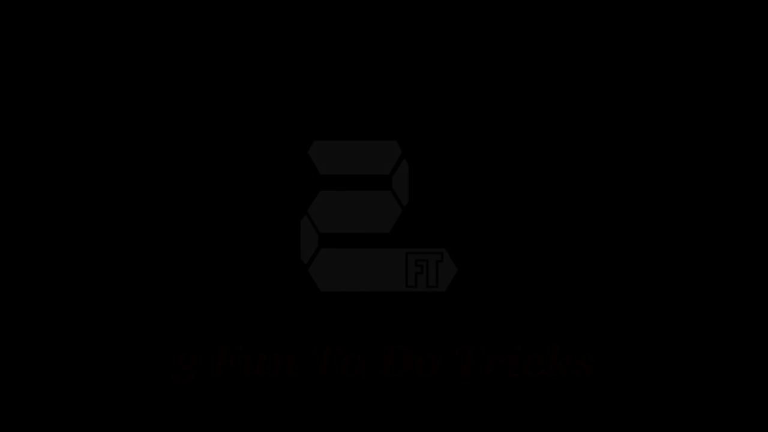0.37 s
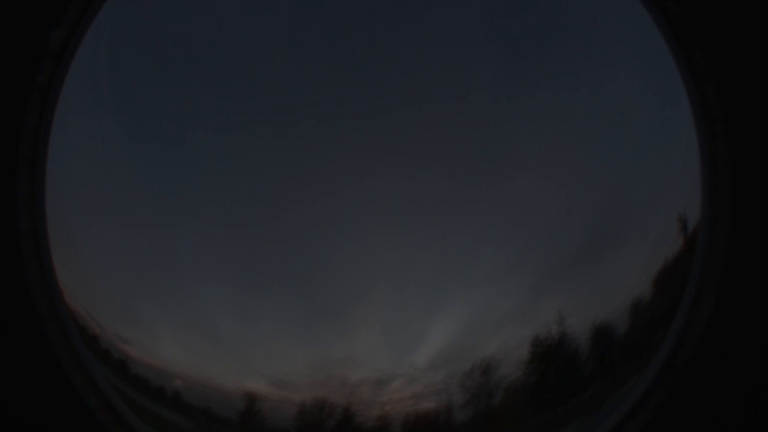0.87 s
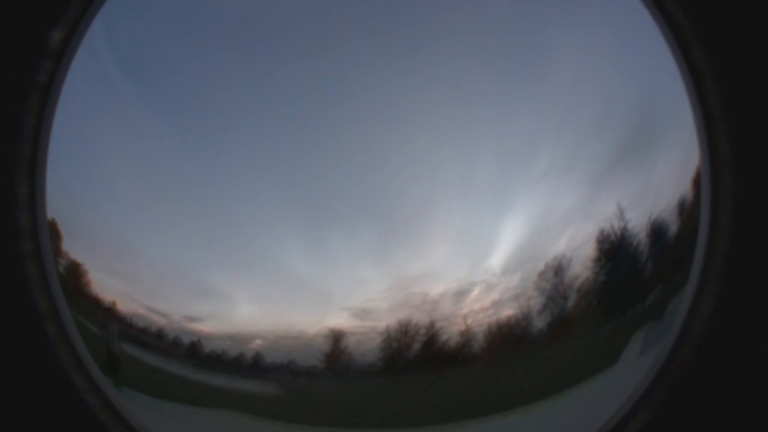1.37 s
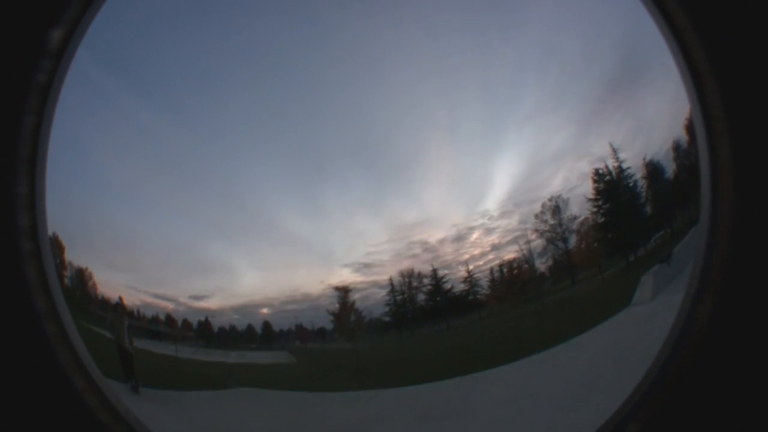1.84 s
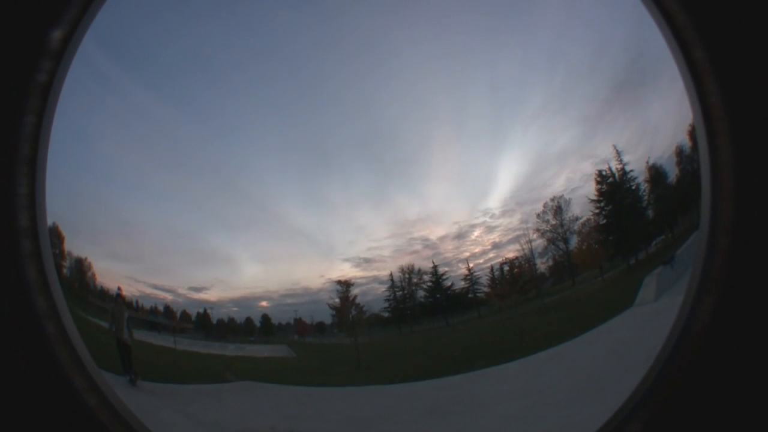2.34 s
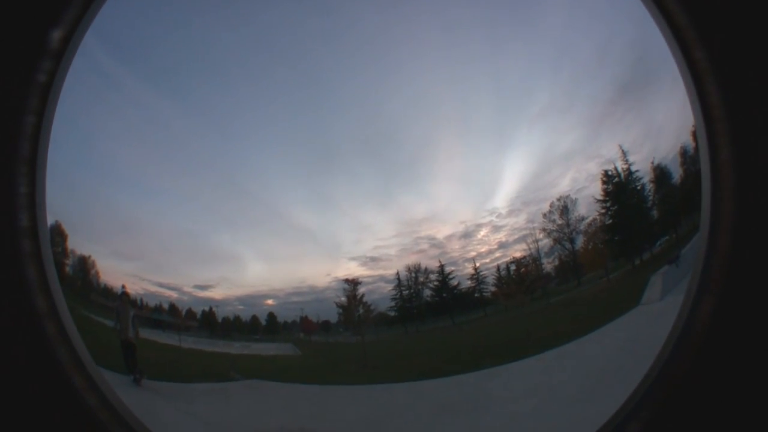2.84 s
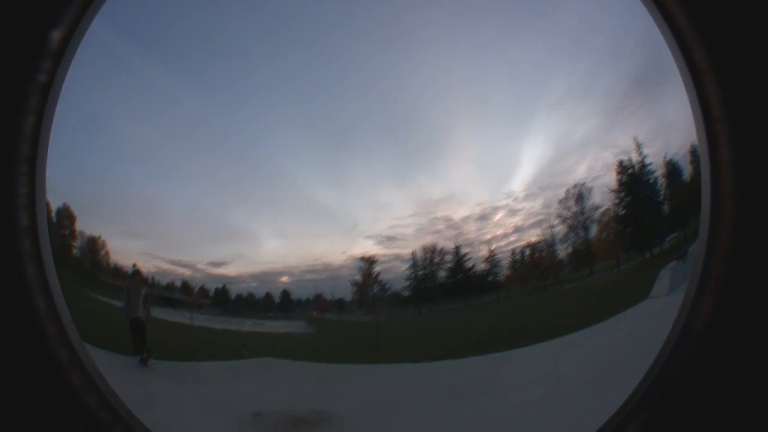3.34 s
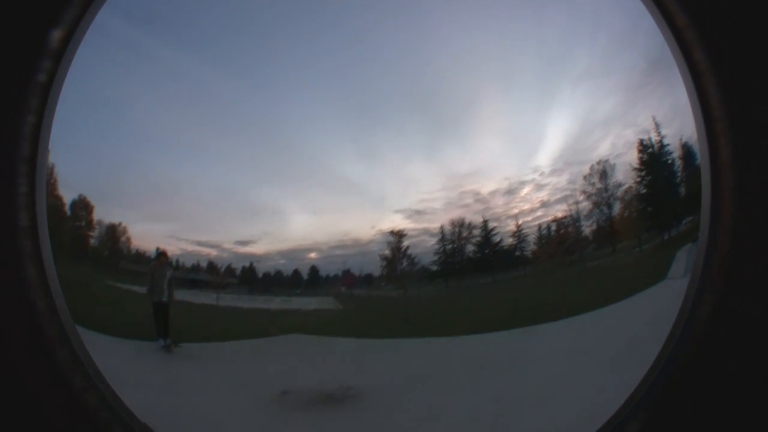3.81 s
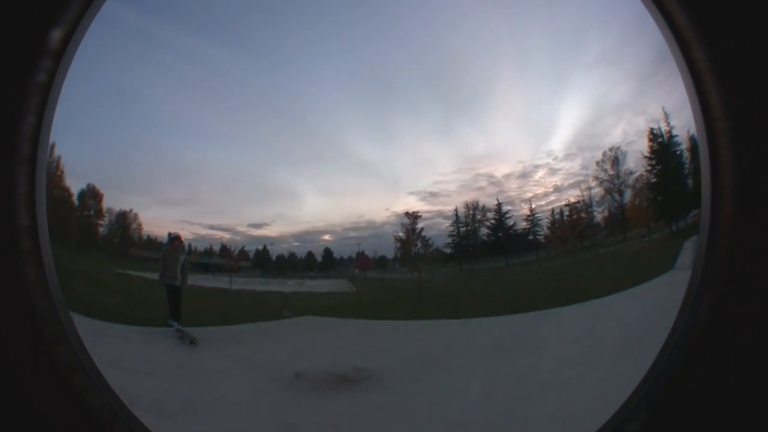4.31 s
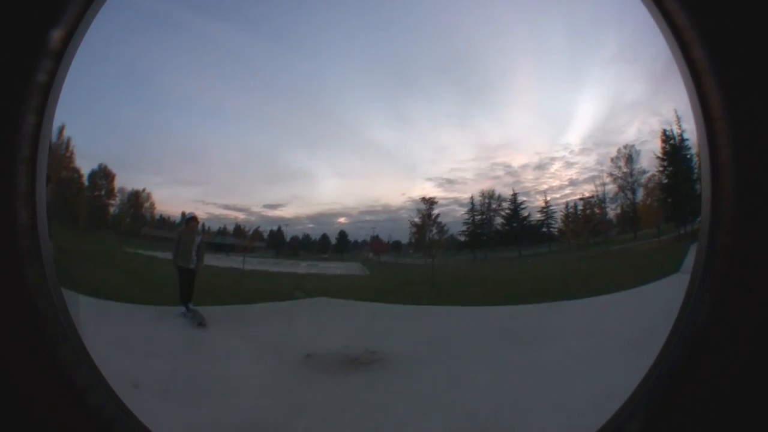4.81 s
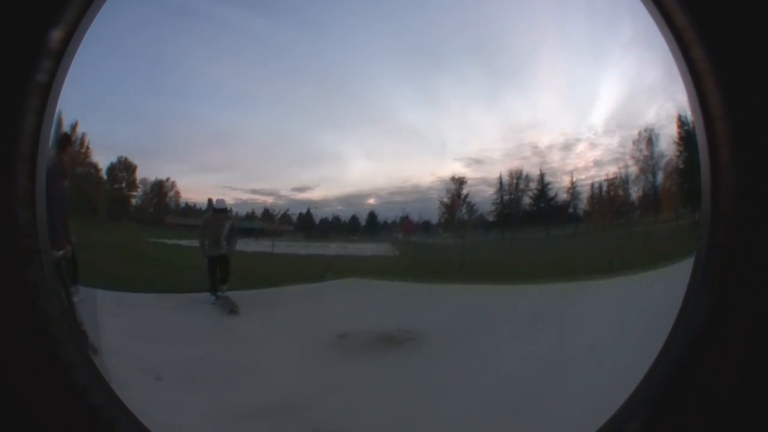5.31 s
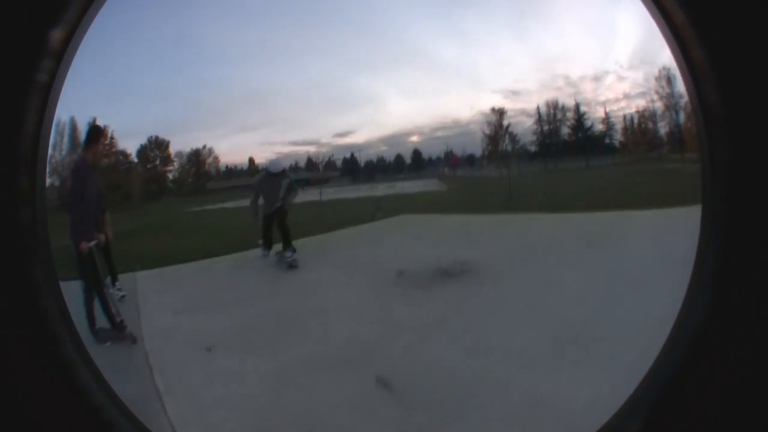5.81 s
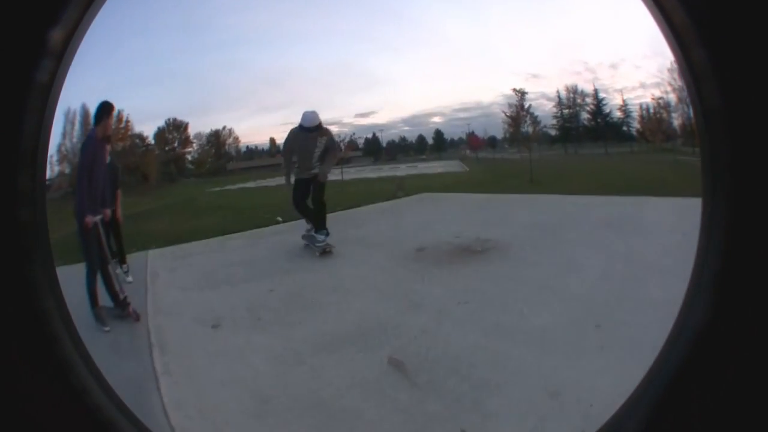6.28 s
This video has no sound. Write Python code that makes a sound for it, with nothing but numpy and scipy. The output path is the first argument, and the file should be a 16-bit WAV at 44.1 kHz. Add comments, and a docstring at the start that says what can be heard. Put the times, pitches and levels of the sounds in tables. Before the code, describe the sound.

After a brief silence, skateboard wheels rumble and rattle over outdoor concrete, with hard wooden pops, clattering landings and gritty scuffs close by.

```python
"""Concrete pad in an open park: skateboards close to a small camera with two microphone ports.
Noise bands give the slab rumble, tyre noise, scuffing soles and tails, and air at the ports.
Grit under the wheels rattles modes of the wooden deck; some modes drone, and metal trucks jingle.
Pops, landings and bumps strike the deck modes with chattering contacts; the highest peaks clip flat."""
import sys
import numpy as np
from scipy import signal
from scipy.fft import rfft, irfft
from scipy.io import wavfile
from scipy.ndimage import uniform_filter1d

SR = 44100
rng = np.random.default_rng(int(sys.argv[2]) if len(sys.argv) > 2 else 0)


def voltage_ratio(decibels):
    """Convert decibels (scalar or array-like) to amplitude ratios, 20 dB per decade."""
    exponent = np.asarray(decibels, float) / 20
    return 10 ** exponent


def materialize(psi):
    """Save the field psi as 16-bit PCM at rate SR to the path in sys.argv[1].

    A 1-D psi becomes a single channel; in a 2-D psi each row is a channel.
    """
    bounded = np.clip(np.atleast_2d(psi).T, -1, 1)
    quanta = np.round(bounded * 32767).astype(np.int16)
    wavfile.write(sys.argv[1], SR, quanta)


N = 282681

# Wheels on concrete. Each row: time in s, rattle level in dB, centre in Hz of the deck modes that the grit shakes.
ROLLING = [(0.7, -36, 726), (1.0, -27, 745), (1.2, -27, 500), (1.32, -44, 508), (1.41, -20, 584),
           (1.46, -23.5, 496), (1.56, -38, 530), (1.8, -30, 449), (2.02, -36.5, 524), (2.35, -28.5, 452),
           (2.62, -36.5, 468), (2.85, -23, 740), (3.2, -32, 545), (3.75, -21.5, 714), (4.0, -23.5, 640),
           (4.2, -16.5, 546), (4.5, -22, 512), (4.68, -16.5, 529), (4.86, -21.5, 478), (5.1, -16.5, 467),
           (5.3, -18.5, 494), (5.45, -20.5, 476), (5.65, -21, 390), (5.8, -23, 390), (5.92, -30, 738),
           (6.1, -35.5, 716), (6.35, -24, 402)]
# Modes of deck and trucks. Each row: frequency in Hz, level in dB, free ring time t60 in s ahead of damping.
DECK_MODES = [(210.3, 4, 0.15), (255.5, 2.5, 0.15), (310, 10, 0.041), (369, 4, 0.1), (457, 3, 0.03),
              (531.8, 3, 0.041), (622, 3, 0.046), (745, -11.5, 0.22), (810.6, 1, 0.049), (1001, 13, 0.017),
              (1063, 6.5, 0.051), (1150, -1, 0.0057), (1300, -7, 0.09), (1352, -8.5, 0.16),
              (1490, -5.5, 0.023), (1720, 5, 0.0065), (2200, 4.5, 0.0084), (2670, 1.5, 0.032)]


def evened(x):
    """Scales to an rms of 1."""
    return x / np.sqrt(np.mean(x ** 2) + 1e-20)


def crest(x):
    """Scales the loudest few milliseconds to an rms of 1."""
    return x / np.sqrt(uniform_filter1d(x ** 2, SR // 150).max())


def read(points, hz):
    """Reads a table on a log-frequency axis."""
    f, value = np.transpose(points)
    return np.interp(np.log(hz + 1), np.log(f + 1), value)


def columns(rows):
    """Turns curve rows into one value a sample, one array a column after the time."""
    s, *cols = np.transpose(rows)
    return [np.interp(np.arange(N) / SR, s, c) for c in cols]


def colour(x, points):
    """Filters by a spectrum in dB."""
    gain = voltage_ratio(read(points, np.fft.rfftfreq(len(x), 1 / SR)))
    return irfft(rfft(x) * gain, len(x))


def soften(x, edge_hz):
    """A soft contact passes little above its edge."""
    return signal.sosfilt(signal.butter(3, edge_hz, fs=SR, output="sos"), x)


def ring(x, hz, t60_s):
    """One damped mode: a unit click rings at height 1."""
    radius = np.exp(-np.log(1000) / (t60_s * SR))
    angle = 2 * np.pi * hz / SR
    return signal.lfilter([.5, 0, -.5], [1, -2 * radius * np.cos(angle), radius * radius], x)


def near(hz, centre_hz, db_per_octave):
    """Modes far from the centre of the excitation are driven less."""
    return voltage_ratio(-db_per_octave * abs(np.log2(hz / centre_hz)))


def lumps(seconds, rms_db):
    """A gain that wanders at random on the given time scale."""
    size = max(round(seconds * SR), 2)
    smooth = uniform_filter1d(uniform_filter1d(rng.standard_normal(N), size), size)
    return voltage_ratio(rms_db * evened(smooth))


def grit(per_s, spread_db):
    """Random grains of sand under the wheels, a few of them large."""
    size = voltage_ratio(spread_db * np.minimum(rng.exponential(1, N), 4))
    return size * rng.standard_normal(N) * (rng.random(N) < per_s / SR)


def scuffed():
    """Grind and hiss gains: the tyres' levels, with a smooth swell for each scuff of sole or tail."""
    # Each row: time in s, grind level in dB, hiss level in dB.
    tyre_db = [(0.66, -28.5, -45), (0.9, -29, -39.5), (1.05, -24.5, -43), (1.2, -26.5, -40),
               (1.54, -35, -46.5), (1.8, -25.5, -40.5), (2.2, -32, -43), (2.5, -24, -40),
               (2.62, -31, -40.5), (3.0, -40.5, -45.5), (3.22, -24.5, -46), (3.5, -35.5, -42.5),
               (3.9, -29.5, -46), (4.5, -39.5, -46.5), (5.1, -42, -48.5), (5.3, -62, -55.5),
               (5.46, -62, -49.5), (5.62, -37, -51), (5.645, -70, -60.5), (5.8, -48, -53.5),
               (5.82, -35, -49), (5.9, -39.5, -47.5), (6.05, -33, -48.5), (6.16, -33, -49),
               (6.26, -29, -51), (6.38, -23, -37.5)]
    # Each row: middle in s, length in s, grind level in dB, hiss level in dB.
    scuffs = [(0.796, 0.085, -20.5, -27.5), (0.97, 0.11, -45, -46.5), (1.699, 0.073, -40, -39),
              (1.858, 0.13, -31, -35), (2.143, 0.19, -30, -37), (1.394, 0.064, -15.5, -26),
              (1.419, 0.017, -31.5, -25.5), (2.336, 0.14, -21.5, -33.5), (2.45, 0.086, -24.5, -38),
              (2.511, 0.052, -22.5, -27.5), (2.7, 0.16, -32, -35.5), (4.28, 0.13, -24, -39),
              (4.561, 0.11, -43, -37.5), (4.723, 0.33, -40.5, -36.5), (5.172, 0.14, -50, -36.5),
              (5.865, 0.2, -25, -45.5), (6.229, 0.055, -26, -62), (6.317, 0.049, -34, -48)]
    t = np.arange(N) / SR
    gains = voltage_ratio(np.array(columns(tyre_db)))
    for middle_s, length_s, *db in scuffs:
        swell = np.cos(np.pi * np.clip((t - middle_s) / length_s, -.5, .5)) ** 2
        gains = np.hypot(gains, voltage_ratio(np.array(db))[:, None] * swell)
    return gains


def bed():
    """Lumpy rumble through the slab, sandy grind and hiss, a swish of urethane, air stirring at the ports."""
    # Each row: time in s, level in dB.
    slab_db = [(0.66, -34), (0.76, -26), (0.87, -28), (1.18, -27.5), (1.31, -20), (1.4, -14), (1.5, -40),
               (1.75, -26.5), (2.4, -27), (2.7, -29.5), (3.26, -25), (3.53, -31.5), (3.94, -33.5),
               (4.7, -26), (5.0, -26.5), (5.2, -23.5), (5.38, -25), (5.57, -30.5), (6.11, -25.5),
               (6.36, -24.5)]
    swish_db = [(0.66, -46), (0.8, -44.5), (1.34, -40), (1.5, -55), (1.71, -41), (1.85, -40.5),
                (2.3, -42.5), (2.52, -39), (2.78, -42), (3.37, -48), (3.81, -52.5), (4.18, -52),
                (4.8, -50.5), (5.42, -66), (5.62, -56), (5.65, -73), (5.8, -76), (5.82, -42), (5.9, -52),
                (6.0, -53), (6.08, -43), (6.16, -50), (6.25, -37.5), (6.38, -36.5)]
    wind_db = [(0.7, -35.5), (1.1, -34), (1.37, -32), (1.56, -37), (1.7, -33.5), (2.6, -35.5),
               (2.87, -30.5), (3.03, -53), (3.4, -37), (3.75, -39), (4.1, -35), (5.3, -34), (5.5, -27),
               (6.35, -29.5)]
    # Each row: frequency in Hz, relative level in dB per Hz.
    rumble_colour = [(47, -11), (80, -11.5), (124, -1), (194, 7), (238, 4), (300, 5.5), (390, -2.5),
                     (660, -120)]
    grind_colour = [(700, 7.5), (1200, 2.5), (1500, -6), (2000, -8.5), (2500, -10.5), (2800, -12.5),
                    (3200, -21), (4000, -36.5), (5500, -29), (22000, -83)]
    hiss_colour = [(2500, -9.5), (3600, -1), (4700, 3), (6000, 0), (7500, -6), (8800, -9.5), (10000, -23.5),
                   (11500, -10), (22000, -92)]
    swish_colour = [(1200, -26), (1700, 9), (2300, 2.5), (3000, -0.5), (3600, -0.5), (4200, -16),
                    (6000, -39.5)]
    buffet_colour = [(8.8, -56.5), (15, -51), (50, -12), (110, -11), (140, -11.5), (240, -120)]

    grind, hiss = scuffed()
    rumble = evened(colour(rng.standard_normal(N) * lumps(seconds=0.061, rms_db=3.0), rumble_colour))
    sand = rng.standard_normal(N) + 0.73 * grit(per_s=900, spread_db=3.5)
    sand = sand * lumps(seconds=0.0033, rms_db=2.5)
    tyres = grind * evened(colour(sand, grind_colour)) + hiss * evened(colour(sand, hiss_colour))
    swish = evened(colour(rng.standard_normal(N) * lumps(seconds=0.018, rms_db=1.9), swish_colour))
    buffet = evened(colour(rng.standard_normal(N), buffet_colour))
    mix = voltage_ratio(columns(slab_db)[0]) * rumble + tyres
    return mix + voltage_ratio(columns(swish_db)[0]) * swish + voltage_ratio(columns(wind_db)[0]) * buffet


def drone():
    """Rolling drives a few deck modes into a roar; each mode catches in its own lumps."""
    # Each row: frequency in Hz, ring time t60 in s.
    modes = [(195, .09), (380, .045), (610, .04), (800, .04)]
    # Each row: time in s, then the level in dB of each mode in turn.
    modes_db = [(2.7, -50.5, -53, -57.5, -45), (2.95, -36, -37, -46, -34), (3.4, -53, -50, -46.5, -35.5),
                (3.9, -60, -38, -40.5, -39), (4.2, -47, -38.5, -33.5, -32), (4.45, -41.5, -34, -42, -34.5),
                (4.65, -47, -40, -27, -52), (4.85, -51, -38, -29.5, -59), (5.0, -34, -22.5, -51.5, -46.5),
                (5.2, -41.5, -25.5, -45.5, -56), (5.42, -25, -23.5, -71, -74), (5.62, -35, -28, -42.5, -44),
                (5.75, -44, -51, -39, -30.5), (5.9, -59.5, -66.5, -56.5, -48)]
    return sum(voltage_ratio(db) * lumps(seconds=0.02, rms_db=2.5) * evened(ring(rng.standard_normal(N), hz, t60_s))
               for db, (hz, t60_s) in zip(columns(modes_db), modes))


def rolling():
    """Dense grit, cushioned by the wheels, shakes the deck and the trucks; rougher concrete comes in lumps."""
    # Metal trucks jingling while the board rolls past. Each row: time in s, level in dB.
    trucks_db = [(2.85, -52.5), (3.25, -41.5), (3.5, -44.5), (3.75, -48), (4.2, -49), (4.7, -49),
                 (4.9, -47.5), (5.15, -52), (5.4, -75), (5.6, -74)]
    # Truck modes. Each row: frequency in Hz, level in dB, ring time t60 in s.
    axle_modes = [(1035, 9, 0.05), (1306, 3, 0.07), (2714, 3, 0.011)]

    level_db, centre_hz = columns(ROLLING)
    patch = lumps(seconds=0.0031, rms_db=0.5)
    drive = soften(grit(per_s=8700, spread_db=0.25), edge_hz=1140) * patch
    wander_hz = centre_hz * lumps(seconds=0.09, rms_db=0.92)
    deck = np.zeros(N)
    for k, (hz, db, t60_s) in enumerate(DECK_MODES):
        mode = evened(ring(drive, hz, 0.34 * t60_s))
        deck += (-1) ** k * voltage_ratio(db) * near(hz, wander_hz, db_per_octave=41.5) * mode
    power = uniform_filter1d(deck ** 2, SR // 5)  # levelled over 0.2 s, so the table sets the loudness
    deck = deck / np.sqrt(abs(power) + 1e-12)
    rattle = voltage_ratio(level_db) * lumps(seconds=0.011, rms_db=0.15) * deck

    jolts = soften(grit(per_s=2300, spread_db=5.5), edge_hz=5100) * patch
    trucks = sum(voltage_ratio(db) * evened(ring(jolts, hz, t60_s)) for hz, db, t60_s in axle_modes)
    passing = np.clip((np.arange(N) / SR - trucks_db[0][0]) / 0.034, 0, 1)
    return rattle + voltage_ratio(columns(trucks_db)[0]) * passing * trucks


def knock(db, centre_hz, thump_db, crack_db, contact_s, edge, share):
    """A chattering contact builds up and dies: it rings the deck, pushes a low thump and throws a crack.

    edge: multiple of the centre up to which force passes; share: ring time left under the rider's weight."""
    # Each row: frequency in Hz, relative level in dB per Hz.
    crack_colour = [(600, -21), (1200, 21), (2000, 9.5), (3000, 8), (4600, 9), (6000, -2), (8500, -5.5),
                    (10200, -32), (13300, -55.5), (22000, -98.5)]
    chatter = rng.standard_normal(6000)
    t = np.arange(len(chatter)) / SR
    force = (1 - np.exp(-t / (0.02 * contact_s))) * np.exp(-t / contact_s)
    first_touch = 3.8 * np.exp(-t / 0.00017)
    blow = soften(chatter * force + first_touch, edge * centre_hz)
    deck = sum((-1) ** k * voltage_ratio(mode_db) * near(hz, centre_hz, db_per_octave=23) * ring(blow, hz, share * t60_s)
               for k, (hz, mode_db, t60_s) in enumerate(DECK_MODES))
    thump = np.sin(2 * np.pi * 185 * t) * (1 - np.exp(-t / 0.0014)) * voltage_ratio(-60 * t / 0.042)
    crack = colour(chatter * abs(chatter), crack_colour) * force ** 0.41  # uneven, spiky rattle
    return voltage_ratio(db) * (crest(deck) + voltage_ratio(thump_db) * crest(thump) + voltage_ratio(crack_db) * crest(crack))


def add_at(mix, s, sound):
    """Adds a sound in place from a time in seconds."""
    at = round(s * SR)
    mix[at:at + len(sound)] += sound


def bumps():
    """The rolling wheels hit bumps, cushion them and knock the deck a little above where the grit shakes it."""
    # Each row: time in s, deck level in dB.
    hits = [(3.53, -14.5), (3.542, -13), (3.685, -21), (3.79, -17.5), (3.902, -16.5), (3.928, -30),
            (3.971, -13), (4.024, -13), (4.035, -12), (4.144, -12), (4.213, -9), (4.533, -18), (4.592, -16),
            (4.612, -15), (4.687, -20), (4.75, -12), (4.797, -8), (4.879, -22.5), (4.927, -16),
            (4.952, -14.5), (4.996, -16), (5.107, -14.5), (5.148, -9.5), (5.162, -13.5), (5.285, -30),
            (5.361, -22.5), (5.409, -17), (5.535, -12), (5.588, -17), (5.602, -19.5), (6.014, -26),
            (6.355, -17)]
    mix = np.zeros(N + SR)
    centre_hz = columns(ROLLING)[1]
    for s, db in hits:
        add_at(mix, s, knock(db, 1.077 * centre_hz[round(s * SR)], thump_db=-32, crack_db=-36,
                             contact_s=0.003, edge=1.88, share=.3))
    return mix[:N]


def knocks():
    """Pops, landings and clatter: wood on concrete is a harder contact and passes more treble."""
    # Each row: time in s, deck level in dB, centre in Hz, thump and crack levels in dB against the deck.
    hits = [(0.79, -28.5, 316, 13, -4.5), (0.984, -17.5, 795, -15, -30), (1.139, -14.5, 324, -14, -8.5),
            (1.155, -10.5, 643, 8, -17), (1.275, -1, 464, -3, -11), (1.282, -10, 416, -12, 0.5),
            (1.29, -19, 520, -10, -6.5), (1.31, -23.5, 600, 7, -1), (1.337, -23.5, 697, 7, -2),
            (1.343, -20.5, 500, 1, -6), (1.351, -27.5, 500, -6, 3), (1.369, -25.5, 313, 11, -21),
            (1.377, -17, 1160, -15, 2.5), (1.381, -25.5, 860, -2.5, -6), (1.385, -10, 677, -1.5, -0.5),
            (1.389, -12, 1510, -4, -24.5), (1.393, -39.5, 974, 0.5, 12), (1.398, -8.5, 467, 3, -13),
            (1.404, -24.5, 305, -20, -7), (1.407, -28, 1100, -15, -3.5), (1.413, -23, 700, -7, -12),
            (1.419, -13, 393, -14, -10), (1.425, -30.5, 416, -12, -20), (1.434, -30.5, 493, -13, 4),
            (1.443, -25, 800, -19, -5.5), (1.467, -11, 612, -33, -8), (1.474, -11, 487, -5, -19),
            (1.481, -16.5, 400, 1.5, 2.5), (1.487, -34.5, 1580, -11, -1.5), (1.503, -22.5, 410, -38, -7.5),
            (1.506, -28.5, 453, 4, 1), (1.846, -24.5, 310, 8.5, -0.5), (1.901, -10, 457, -26.5, -11),
            (1.903, -13.5, 820, -26, -10), (1.907, -17.5, 526, -36, 1.5), (2.102, -26.5, 725, -36, 4.5),
            (2.291, -11.5, 592, 0.5, -7.5), (2.318, -24.5, 416, -26, 5.5), (2.421, -31.5, 288, -30, 3.5),
            (2.447, -2, 241, -9, -21.5), (2.446, -18.5, 700, -13, -16), (2.454, -10.5, 470, 4, -22),
            (2.541, -15.5, 894, -3, -10), (2.548, -11.5, 827, -22, 5.5), (2.655, -31, 860, -24, 3.5),
            (2.68, -32, 910, -20, -3.5), (2.7, -24.5, 860, -4, -10), (2.897, 4, 660, -17, -16.5),
            (2.906, -4, 800, -28, -9), (2.916, -13, 800, -11, -14.5), (2.928, -16, 805, -22, -10.5),
            (3.074, -22, 1000, -25, -4.5), (3.082, -18.5, 814, -15, -19), (3.098, -25, 810, -11, -26),
            (3.215, -25, 796, 9, -3.5), (3.153, -25, 1020, -6, -12), (3.247, -10.5, 1050, -16.5, -9),
            (3.249, -1.5, 647, -20.5, -24), (3.275, -17, 620, -20, -10), (3.409, -16.5, 940, -22, -16.5),
            (3.415, -16.5, 810, -22, -19.5), (3.448, -11, 694, -6, -11.5), (3.455, -8.5, 808, -19.5, -17),
            (3.724, -14, 787, -5.5, -6), (3.728, -7.5, 1160, -8.5, -10), (3.744, -17, 990, -4, -11.5),
            (4.25, -17.5, 326, -20, -7), (4.261, -16.5, 786, -28, -21), (4.277, -15.5, 680, -20, -17),
            (4.299, -7.5, 635, -26, -16.5), (4.337, -13, 950, -29, -25.5), (5.493, -13, 483, -28, -25),
            (5.549, -24, 700, -15, -8), (5.565, -17.5, 960, -28, -24), (5.609, -23.5, 447, -22, -22),
            (5.815, -22, 466, -1, -5), (5.817, -34, 2470, -25, -6), (5.823, -11.5, 345, -4.5, -14.5),
            (5.826, -23.5, 2660, -18, -12), (5.827, -15.5, 436, -14, -19), (5.836, -24, 398, -8, -8),
            (5.844, -25, 610, -19, -17), (5.868, -7, 494, -14.5, -16.5), (5.871, -38, 2200, -18, -9.5),
            (5.876, -24, 440, -14, -4), (5.883, -12, 448, -19, -16), (5.892, -26.5, 504, 4.5, -8),
            (6.015, -21, 400, -5, -15), (6.184, -37, 2410, -20, 6), (6.208, -31, 2200, -17, -23),
            (6.212, -23, 1110, -26, -17.5), (6.245, -32, 1190, 4, -0.5)]
    mix = np.zeros(N + SR)
    for s, *row in hits:
        add_at(mix, s, knock(*row, contact_s=0.0026, edge=3.07, share=.55))
    return mix[:N]


def ports(x):
    """Two close ports hear a small lag, plus diffuse scattered sound in short, changing echo patterns."""
    # Each row: frequency in Hz, phase in radians by which the left leads.
    lead_rad = [(100, 0), (300, .1), (1200, .95), (2300, .9), (3400, 1.1), (4200, 2), (7000, 3.5),
                (9500, 4.4)]
    # Each row: frequency in Hz, left over right in dB.
    lean_db = [(60, .4), (600, 0), (1300, 1), (2500, 2.8), (5000, 3.4), (9800, 3.9)]
    # Scattered sound. Each row: frequency in Hz, gain in dB.
    diffuse_db = [(60, -14.5), (150, -15), (300, -13), (1000, -7.5), (2000, -6.5), (4000, -6.5),
                  (9000, -7.5)]
    # Where the action sits. Each row: time in s, left over right in dB.
    pan = [(0.7, -1.5), (1.05, -3.5), (1.4, 1.5), (2.2, -2), (2.6, 1.5), (3.5, 0.5), (3.75, -2.5),
           (4.0, 1.5), (5.3, -1.5), (6.35, -0.5)]

    hz = np.fft.rfftfreq(N, 1 / SR)
    half = voltage_ratio(read(lean_db, hz) / 2) * np.exp(.5j * read(lead_rad, hz))
    direct = irfft(rfft(x) * np.array([half, 1 / half]), N)
    pan_db = columns(pan)[0]
    direct = direct * voltage_ratio(np.array([pan_db, -pan_db]) / 2)

    step = .04 * SR  # samples between fresh echo patterns, which crossfade
    t = np.arange(SR // 12) / SR
    place = np.arange(N) / step
    scattered = np.zeros((2, N))
    for k in range(int(place[-1]) + 2):
        a = max(round((k - 1) * step), 0)
        b = min(round((k + 1) * step), N)
        taps = rng.standard_normal((2, len(t))) * voltage_ratio(-60 * t / 0.054)
        taps = taps / np.linalg.norm(taps, axis=1)[:, None]
        part = x[a:b] * np.cos(np.pi / 2 * (place[a:b] - k))
        echo = signal.fftconvolve(part[None], taps, axes=1)[:, :N - a]
        scattered[:, a:a + echo.shape[1]] += echo
    return direct + np.array([colour(c, diffuse_db) for c in scattered])


def scene():
    """Bed, drone, rolling, bumps and knocks reach the pair of ports."""
    return ports(bed() + drone() + rolling() + bumps() + knocks())


def roll_off(x):
    """The treble ends steeply here."""
    return signal.sosfilt(signal.butter(12, 10400, fs=SR, output="sos"), x)


def record(dry):
    """The sound cuts in after silence; peaks clip flat."""
    start_s, rise_s = .632, 0.0066
    cut_in = np.clip((np.arange(N) / SR - start_s) / rise_s, 0, 1)
    return roll_off(np.clip(dry * cut_in, -1, 1))


dry = scene()
out = record(dry)
materialize(out)
```